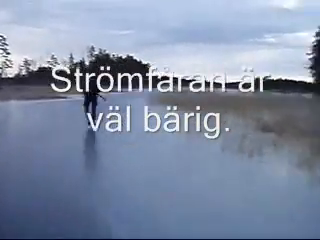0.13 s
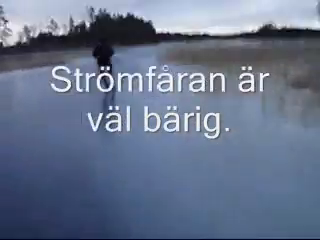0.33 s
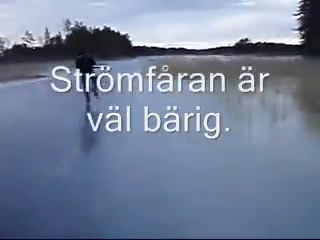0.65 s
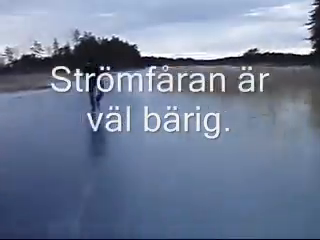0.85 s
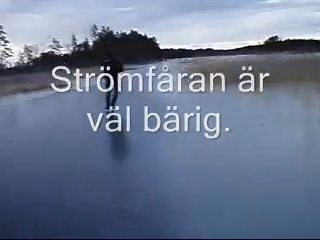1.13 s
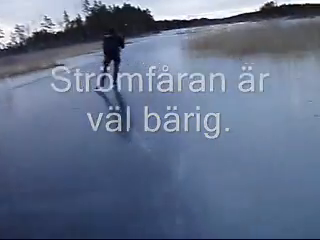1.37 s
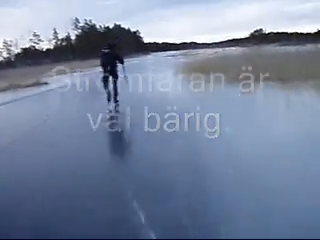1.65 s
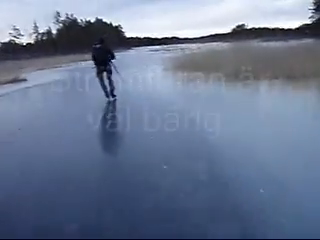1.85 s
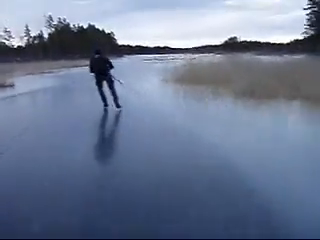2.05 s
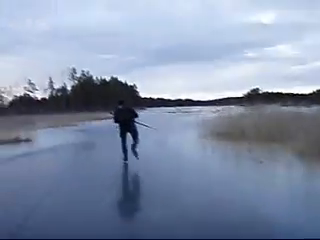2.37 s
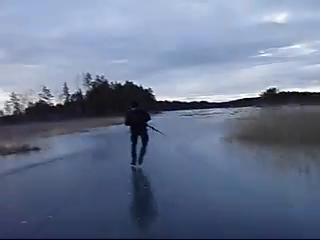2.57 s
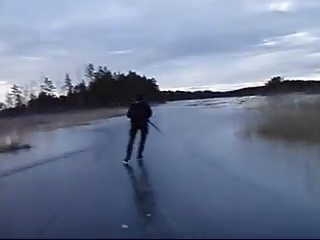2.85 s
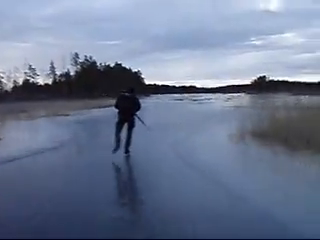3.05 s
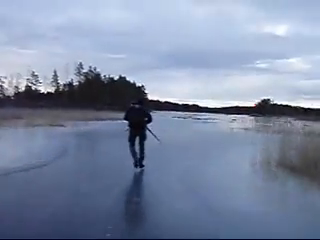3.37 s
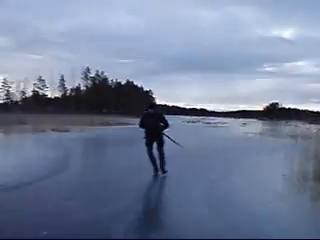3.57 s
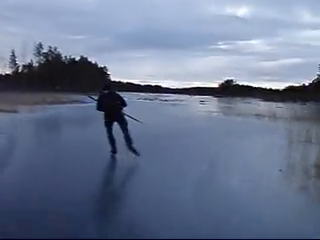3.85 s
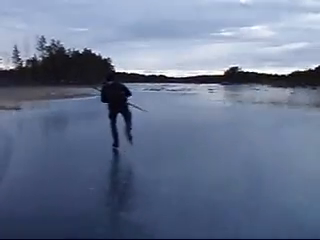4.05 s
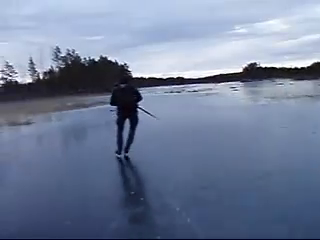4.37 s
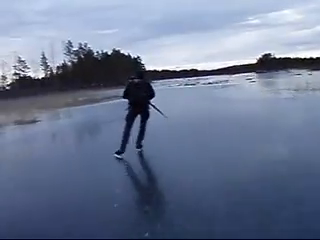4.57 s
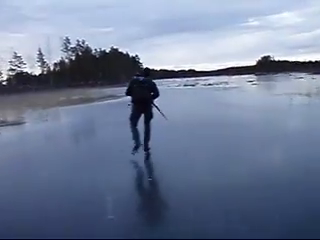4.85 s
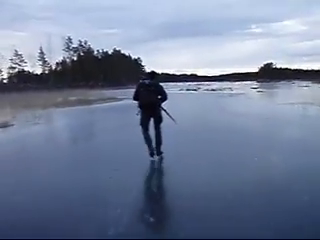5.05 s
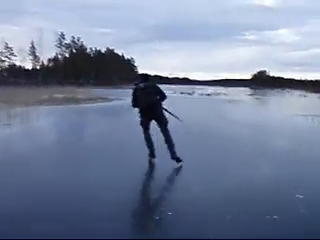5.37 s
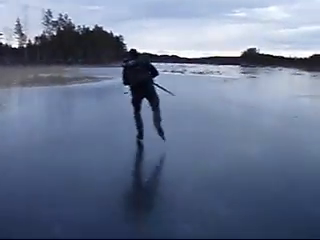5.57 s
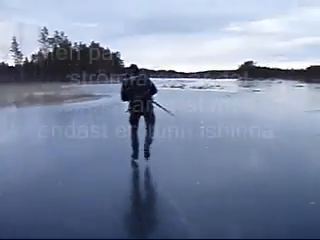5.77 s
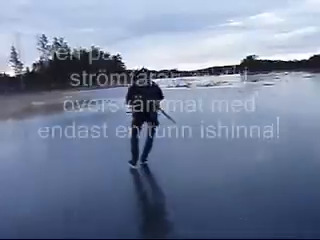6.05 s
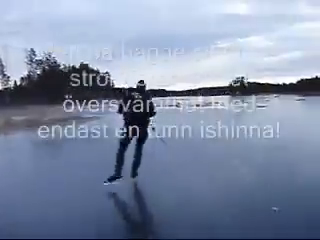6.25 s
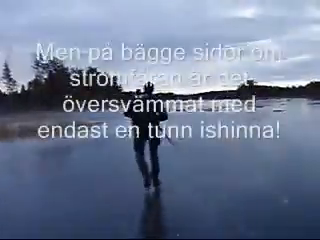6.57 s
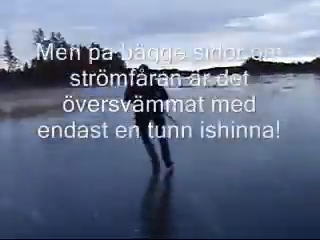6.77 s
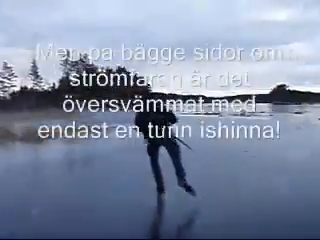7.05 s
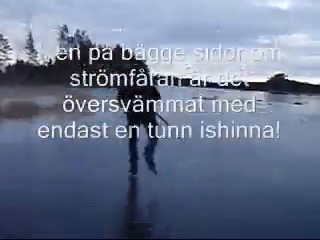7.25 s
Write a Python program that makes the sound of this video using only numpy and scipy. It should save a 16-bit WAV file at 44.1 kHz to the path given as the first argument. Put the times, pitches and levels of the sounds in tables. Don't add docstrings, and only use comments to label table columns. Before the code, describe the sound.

Long skate blades scrape and hiss across a frozen lake, with sharp ice cracks, hollow knocks and light wind buffeting the microphone.

```python
import sys
import numpy as np
from scipy import signal
from scipy.fft import rfft, irfft
from scipy.io import wavfile
from scipy.ndimage import uniform_filter1d

SR = 44100
rng = np.random.default_rng(int(sys.argv[2]) if len(sys.argv) > 2 else 0)


def pcm_store(signal):
    levels = np.round(np.clip(np.atleast_2d(signal), -1, 1) * 32767)
    wavfile.write(sys.argv[1], SR, levels.astype(np.int16).T)


def linear_from_db(decibels):
    return 10 ** (np.asarray(decibels, float) / 20)


N = 326823
SECONDS = np.arange(N) / SR


def rms_one(x):
    return x / np.sqrt(np.mean(x ** 2) + 1e-20)


def in_time(rows):
    s, *columns = np.transpose(rows)
    return [np.interp(SECONDS, s, column) for column in columns]


def drift(rate):
    r = np.exp(-2 * np.pi * rate / SR)
    slow = signal.lfilter([1], [1, -2 * r, r * r], rng.standard_normal(N + SR))
    return rms_one(slow[SR:])


def coloured(x, spectrum):
    size = 8192
    hz, db = np.transpose(spectrum)
    bins_hz = np.arange(size // 2 + 1) * SR / size
    log_gain = np.log(linear_from_db(np.interp(np.log(bins_hz + 1), np.log(hz), db)))
    cepstrum = irfft(log_gain)
    cepstrum[1:size // 2] *= 2
    cepstrum[size // 2 + 1:] = 0
    impulse = irfft(np.exp(rfft(cepstrum)))
    return signal.fftconvolve(x, impulse)[:len(x)]


def ring(clicks, hz, cycles):
    r, w = linear_from_db(-60 * hz / (cycles * SR)), 2 * np.pi * hz / SR
    return signal.lfilter([0, np.sin(w)], [1, -2 * r * np.cos(w), r * r], clicks + 1e-18)


def grains(per_s, spread_db, clump_db, clump_rate):
    sizes = linear_from_db(spread_db * np.minimum(rng.exponential(1, N), 4)) * rng.choice([-1, 1], N)
    return sizes * linear_from_db(clump_db * drift(clump_rate)) * (rng.random(N) < per_s / SR)


def stroke(s, db, rise_s, fall_s, hold):
    late = SECONDS - s
    away = np.maximum(late / fall_s, -late / rise_s)
    return linear_from_db(np.maximum(2 * db - 40 * away ** hold, -400))


# time in seconds, level in dB.
WIND_LEVEL = [(0, -37.5), (0.7, -35), (1.0, -41), (1.3, -37.5), (1.7, -40.5), (2.1, -32), (2.38, -33.5),
              (2.55, -39), (3.1, -34), (3.6, -42), (5.8, -39.5), (7.41, -40)]
# frequency in Hz, density in dB per Hz.
WIND_COLOUR = [(14, -29), (45, 1.5), (90, -2), (170, 1.5), (400, -22)]


def wind():
    level_db, = in_time(WIND_LEVEL)
    return linear_from_db(level_db + 2.8 * drift(8)) * rms_one(coloured(rng.standard_normal(N), WIND_COLOUR))


# time in seconds, edge pressure as shaving level in dB,
# roughness of the ice as crackle level in dB over the shaving.
GLIDE_PATH = [(0, -24.5, 2), (.2, -19.5, -2.5), (.45, -32.5, 0), (.84, -28, -9), (1.3, -31.5, -1),
              (1.65, -26.5, -5.5), (2.07, -30, -5), (2.5, -31, -21), (2.7, -26.5, 0.5), (3.4, -44, 3),
              (3.9, -41, -11.5), (4.2, -28.5, 1), (4.5, -34.5, -10), (5.03, -35, 7), (5.5, -24.5, 3.5),
              (5.7, -41, -16), (6.1, -26, -2), (6.67, -34, 2)]


def glide():
    glide_db, rough_db = in_time(GLIDE_PATH)
    glide_db = glide_db - 4
    return linear_from_db(2 * glide_db), linear_from_db(2 * (glide_db + rough_db))


# peak in seconds, level in dB,
# rise and fall in seconds for 20 dB.
PUSH_STROKES = [(.13, -24, 0.37, 0.66), (.59, -16.5, 0.14, 0.088), (.75, -27.5, 0.38, 0.061),
                (1.5, -11, 0.084, 0.0737), (1.78, -30, 0.36, 0.034), (2.23, -21.5, 0.66, 0.11),
                (2.42, -31.5, 0.142, 0.26), (3.004, -12, 0.066, 0.165), (3.31, -27, 0.99, 0.061),
                (3.371, -20, 0.011, 0.019), (3.53, -19.5, 0.13, 0.58), (3.89, -15, 0.14, 0.13),
                (4.04, -30, 0.155, 0.1), (4.27, -31, 0.48, 0.091), (4.72, -10.5, 0.17, 0.098),
                (4.91, -26, 0.22, 0.257), (5.09, -19.5, 0.045, 0.13), (5.23, -16, 0.12, 0.16),
                (5.41, -16, 0.152, 0.34), (6.316, -8, 0.13, 0.13), (6.49, -20.5, 0.053, 0.11),
                (6.6, -22.5, 0.128, 0.12), (6.71, -11.5, 0.012, 0.066), (6.84, -17.5, 0.11, 0.132),
                (6.93, -15.5, 0.042, 0.26), (7.06, -12.5, 0.186, 0.22), (7.4, -19.5, 0.065, .2)]
PUSH_HOLD = 1.01


def pushes():
    return sum(stroke(*row, PUSH_HOLD) for row in PUSH_STROKES)


# peak in seconds, level in dB,
# fall in seconds for 20 dB (negative: builds slowly, stops short), crackle pitch in Hz.
ICE_BITES = [(.04, -18.5, 0.26, 1640), (.52, -28.5, 0.97, 1760), (1.831, -26, 0.65, 1550),
             (1.929, -25.5, 0.9, 2100), (2.17, -27, 0.65, 1640), (2.559, -19, 0.2, 1904),
             (2.6, -24, 0.13, 1420), (2.75, -37, 0.8, 1610), (3.08, -27.5, 0.6, 2034),
             (3.493, -22, 0.73, 1550), (3.64, -24.5, 0.8, 2280), (3.81, -18, 0.3, 1500),
             (4.364, -20, 0.3, 1850), (4.547, -24, 0.5, 1500), (4.645, -39, 6, 1661),
             (4.88, -40, -2.02, 1692), (5.313, -31, 1, 1810), (5.41, -28, -2.5, 1500), (5.53, -32, 1, 1890),
             (6.35, -21.5, 0.26, 1660), (6.385, -32, 0.5, 1100), (6.704, -22.5, 1, 2170),
             (7.061, -21.5, 0.5, 1700), (7.335, -33, 3, 1780)]
BITE_HOLD, BITE_RISE_SHARE = 1.22, 0.081
BITE_SAG_PER_S, BITE_SAG_S = 6.9, 0.09


def bites():
    powers, pitches = [], []
    for s, db, fall_s, hz in ICE_BITES:
        powers.append(stroke(s, db, BITE_RISE_SHARE * fall_s, fall_s, BITE_HOLD))
        sag_per_s = BITE_SAG_PER_S * min(BITE_SAG_S / fall_s, 1)
        pitches.append(hz * np.exp(-sag_per_s * np.clip(SECONDS - s, 0, .1)))
    return powers, pitches


# start in seconds, length in seconds, level in dB,
# first and last pitch in Hz.
SKID_SCRAPES = [
    (0.909, 0.085, -18, 2000, 874),
    (1.056, 0.0456, -21, 1500, 1960),
    (1.759, 0.036, -22.5, 1500, 1300),
    (1.94, 0.03, -20, 1500, 1700),
    (4.046, 0.0165, -17.5, 1400, 1300),
    (5.497, 0.13, -28.5, 950, 800),
    (6.698, 0.027, -29, 2320, 2000),
    (3.502, 0.035, -22, 1500, 1300),
]
SCRAPE_RISE_S, SCRAPE_HOLD = 0.00185, 4.9


def scrapes():
    powers, pitches = [], []
    for s, length, db, *hz in SKID_SCRAPES:
        powers.append(stroke(s, db, SCRAPE_RISE_S, length, SCRAPE_HOLD))
        pitches.append(np.interp(SECONDS, [s, s + length], hz))
    return powers, pitches


PUSH_CRACKLES_DB, BITE_SHAVES_DB, SCRAPE_SHAVES_DB = -10, -3, -3
GLIDE_HZ, PUSH_HZ = 1500, 2150


def edge_work():
    glide_shave, glide_crackle = glide()
    push_shave = pushes()
    bite_powers, bite_hz = bites()
    scrape_powers, scrape_hz = scrapes()
    parts = [glide_crackle, linear_from_db(2 * PUSH_CRACKLES_DB) * push_shave] + bite_powers + scrape_powers
    pitches = [GLIDE_HZ, PUSH_HZ] + bite_hz + scrape_hz
    crackles = sum(parts)
    centre_hz = sum(part * hz for part, hz in zip(parts, pitches)) / crackles
    shave = glide_shave + push_shave
    shave = shave + linear_from_db(2 * BITE_SHAVES_DB) * sum(bite_powers) + linear_from_db(2 * SCRAPE_SHAVES_DB) * sum(scrape_powers)
    return 10 * np.log10(shave), 10 * np.log10(crackles), centre_hz, glide_crackle / crackles


# middle in seconds, length in seconds, depth in dB (negative: a slight
BLADE_DIPS = [(0.053, 0.0052, 11), (0.079, 0.0088, 4.5), (0.204, 0.011, 5), (0.46, 0.0085, 10),
              (0.473, 0.016, 6), (0.609, 0.01, 6.5), (0.915, 0.0059, 8), (1.874, 0.0124, 4),
              (2.048, 0.017, 7), (2.085, 0.0039, 20), (2.16, 0.02, 5), (2.194, 0.014, 4),
              (2.381, 0.0113, 6.5), (2.756, 0.0074, -1), (3.077, 0.022, 2.5), (3.26, 0.0144, 6),
              (3.482, 0.0098, 18), (3.716, 0.013, 6.5), (3.79, 0.0087, 13), (3.843, 0.015, 3.5),
              (3.867, 0.0094, 6.5), (3.893, 0.0093, 4), (4.433, 0.0132, 8), (4.463, 0.017, 12),
              (4.499, 0.0183, 7.5), (4.533, 0.0108, 3), (4.589, 0.01, 12.5), (4.615, 0.021, 9.5),
              (5.242, 0.008, 8), (5.385, 0.0085, 6), (5.404, 0.0069, 4), (5.51, 0.0082, 5.5),
              (5.529, 0.014, 2), (5.929, 0.0077, 9), (6.114, 0.013, 12), (6.252, 0.0087, 7),
              (6.662, 0.02, 10.5), (6.689, 0.0083, 11), (6.747, 0.011, 4.5), (6.821, 0.02, 4.5),
              (6.949, 0.0113, 2.5), (7.167, 0.014, 4), (7.24, 0.013, 5.5), (7.274, 0.015, 13)]


def dip_gain():
    loss_db = 0
    for s, length, depth_db in BLADE_DIPS:
        away = np.minimum((1.6 * (SECONDS - s) / length) ** 2, 50)
        loss_db = loss_db + depth_db * np.exp(-away ** 2)
    return linear_from_db(-loss_db)


def uneven_grip():
    stutter = drift(63.0) + 0.86 * drift(43)
    settling = 160 * SECONDS
    return np.maximum.accumulate(stutter + settling) - settling


def patchy(x, depth_db):
    edges = np.geomspace(5200, 11000, 5)
    out = x
    for pair in zip(edges, edges[1:]):
        band = signal.sosfilt(signal.butter(1, pair, "band", fs=SR, output="sos"), x)
        out = out + (linear_from_db(depth_db * drift(22.0)) - 1) * band
    return out


# frequency in Hz, density in dB per Hz.
SPLINTER_COLOUR = [(900, -33), (2500, -10), (3450, -5.5), (3830, 0), (4040, -2.5), (4260, -.5),
                   (4750, -8.5), (5700, -15.5), (7300, -23.5), (8250, -19.5), (9200, -24.5), (11200, -18.5),
                   (11820, -10.5), (12400, -13)]


def shaving(stutter, level_db):
    splinters = grains(14000, spread_db=2.0, clump_db=3.0, clump_rate=410)
    splinters *= linear_from_db(np.interp(level_db, [-35, -10], [1.8, 1.3]) * stutter)
    return linear_from_db(level_db + 3.0) * rms_one(patchy(coloured(splinters, SPLINTER_COLOUR), depth_db=2.5))


GLIDE_FOCUS_DB, WORK_FOCUS_DB = 7.5, 15
PITCH_WANDER = 0.46
CRACKLE_CYCLES = 30.0


def crackle(stutter, level_db, centre_hz, gliding):
    clicks = grains(4500, spread_db=3.0, clump_db=2.0, clump_rate=134) * linear_from_db(1.3 * stutter)
    pitches, dealt = np.geomspace(640, 2900, 14), rng.integers(0, 14, N)
    wander = rms_one(uniform_filter1d(stutter[::-1], size=3000))
    centre_hz = centre_hz * 2 ** (PITCH_WANDER * gliding * wander)
    focus_db = GLIDE_FOCUS_DB * gliding + WORK_FOCUS_DB * (1 - gliding)
    rings = 0
    for k, hz in enumerate(pitches):
        gain = linear_from_db(-focus_db * np.log2(hz / centre_hz) ** 2)
        rings = rings + ring(clicks * (dealt == k) * gain, hz, CRACKLE_CYCLES)
    low_cut = signal.butter(2, 680, "high", fs=SR, output="sos")
    return linear_from_db(level_db - 1.3) * rms_one(signal.sosfilt(low_cut, rings))


# peak in seconds, level in dB,
# rise and fall in seconds for 20 dB.
SHEET_GROANS = [
    (.96, -30, 0.062, 0.046),
    (2.67, -34.5, 0.15, 0.72),
    (3.535, -23.5, 0.02, 0.48),
    (4.06, -40.5, 0.31, 0.105),
    (5.45, -28, 0.083, 0.25),
]


def groans():
    return sum(stroke(*row, PUSH_HOLD) for row in SHEET_GROANS)


# frequency in Hz, density in dB per Hz.
SHEET_COLOUR = [(90, -14), (200, -2), (350, -1.5), (600, -3), (900, -15), (1500, -23)]
LOAD_DB, LOAD_FOLLOWS, LOAD_SMOOTH_S = -37, 0.57, 0.091


def rumble(crackle_db):
    load = uniform_filter1d(crackle_db - crackle_db.mean(), int(LOAD_SMOOTH_S * SR))
    level_db = 10 * np.log10(linear_from_db(2 * (LOAD_DB + LOAD_FOLLOWS * load)) + groans())
    lumps = grains(1500, spread_db=3.2, clump_db=2.2, clump_rate=19.5)
    return linear_from_db(level_db + 1.0) * rms_one(coloured(lumps, SHEET_COLOUR))


THUMP_START_HZ, THUMP_END_HZ = 725, 238
THUMP_SPREAD = 0.62
KNOCK_CYCLES, KNOCK_CYCLES_PER_KHZ = 0.58, 0.45
REPEAT_S, REPEAT_SPREAD_S, REPEAT_DB = .0009, .0022, -4.5
PORT_HZ, PORT_CYCLES = 4050, 26.0
PORT_SHARE, LOUD_PORT_SHARE = .04, 0.017


def knock_of(t, hz, hiss):
    cycles = KNOCK_CYCLES + KNOCK_CYCLES_PER_KHZ * hz / 1000
    fall = 1 + 0.66 * np.exp(-t / 0.0006)
    tone = np.sin(2 * np.pi * hz * 0.869 * np.cumsum(fall) / SR)
    return tone * np.exp(-t * hz / cycles) * (1 + 1.14 * uniform_filter1d(hiss, size=4))


def thump_of(t, luck):
    fall_s = 0.00076 + 0.0021 * luck[0]
    hz = THUMP_END_HZ + (THUMP_START_HZ - THUMP_END_HZ) * np.exp(-t / fall_s)
    hz = hz * 2 ** (THUMP_SPREAD * (luck[1] - .62))
    swell = t / 0.0019 * np.exp(1 - t / 0.001482)
    return np.sin(2 * np.pi * (np.cumsum(hz) / SR + 0.417 + 0.18 * luck[1])) * swell


def snap_of(t, snap_db, luck, hiss):
    burst_s = 0.00059 + 0.00075 * luck[2] + 0.00038 * linear_from_db(min(snap_db, 4) - 10.5)
    snap = coloured(hiss * t ** 0.76 * np.exp(-t / burst_s), SPLINTER_COLOUR)
    port_share = PORT_SHARE + LOUD_PORT_SHARE * linear_from_db(snap_db)
    snap = snap + port_share * ring(snap, PORT_HZ, PORT_CYCLES)
    return snap / np.abs(snap).max()


def cracks(rows):
    size = SR // 40
    t, out = np.arange(size) / SR, np.zeros(N + size)
    chance, noise = rng.random((len(rows), 3)), rng.standard_normal((len(rows), size))
    for (s, hz, thump_db, knock_db, snap_db), luck, hiss in zip(rows, chance, noise):
        knock = knock_of(t, hz, hiss)
        delay = round((REPEAT_S + REPEAT_SPREAD_S * luck[2]) * SR)
        second = np.concatenate([np.zeros(delay), knock[:-delay]])
        knock = knock + linear_from_db(REPEAT_DB) * np.sign(luck[1] - .5) * second
        at = round((s - .0002) * SR)
        out[at:at + size] += linear_from_db(knock_db + 4.5) * knock
        out[at:at + size] += linear_from_db(thump_db + 1.0) * thump_of(t, luck)
        out[at:at + size] += linear_from_db(snap_db - 0.1) * snap_of(t, snap_db, luck, hiss)
    return out[:N]


def ice_echo(x):
    lag = round(.00235 * SR)
    return x + linear_from_db(-16) * np.concatenate([np.zeros(lag), x[:-lag]])


def knocking(table, thump_over_knock_db):
    return [(s, hz, db + thump_over_knock_db, db, snap_db) for s, hz, db, snap_db in table]


# start in seconds, knock pitch in
# Hz, knock level in dB, snap level in dB.
EDGE_CHIPS = [(0.092, 1210.0, -11, -9), (0.276, 1200.0, -27.5, -5), (0.352, 1550.0, -21, -8.5),
              (0.551, 1860.0, -31, -6), (0.73, 2210.0, -28, -4), (0.943, 1360, -6, -7),
              (1.068, 1950, -8.5, -7), (1.084, 1730, -11.5, -32.5), (1.86, 1312, -4.5, -13),
              (1.891, 1400.0, -20, -7), (1.997, 2130.0, -33.5, -7), (2.133, 1660, -17, -9),
              (2.573, 1630.0, -25, -13), (3.203, 1070, -20, -35.5), (3.497, 1670, -11.5, -14),
              (3.539, 1310.0, -9.5, -33.5), (3.658, 2180.0, -31, -7), (3.688, 2120, -10, -10),
              (3.723, 1270, -5, -34.5), (3.805, 1990.0, -28, -4), (3.859, 1350.0, -37, -14),
              (4.076, 1580, -17.5, -7), (4.095, 1230, -10, -35), (4.308, 990, -14.5, -36),
              (4.4, 1530.0, -6, -22), (4.563, 1580, -4, -6), (4.573, 2150, -8, -37),
              (4.65, 1350.0, -15, -19), (4.655, 1250.0, -15.5, -10.5), (4.938, 1490.0, -9, -26),
              (4.952, 1160, -3.5, -35.5), (5.061, 2230.0, -18.5, -5.5), (5.183, 2350.0, -39.5, -2),
              (5.22, 1530.0, -15, -35), (5.334, 1620, -5, -27), (5.35, 1840.0, -12, -9),
              (5.339, 1030, -17.5, -28), (0.466, 940, -13.5, -28), (2.228, 900, -22, -30),
              (5.47, 844, -3, -28), (5.421, 1890, -11, -31), (5.442, 1980.0, -37, -15),
              (5.542, 1630.0, -15, -9), (6.24, 1800, -12, -44), (6.35, 1780.0, -18, -13.5),
              (6.367, 1780.0, -10, -55), (6.468, 1950.0, -43, -11), (6.697, 2330, -17, -15),
              (6.731, 1440.0, -45, -19), (6.931, 1610, -15, -14), (7.078, 1570, -6.5, -35.5),
              (7.095, 1710, -10, -36), (7.119, 1460.0, -33.5, -4), (7.133, 1870.0, -37.5, -14)]


def chips():
    return knocking(EDGE_CHIPS, -14)


# start in seconds, knock pitch in Hz,
# knock level in dB, snap level in dB.
DEEP = [(.095, 2680, -12, 1), (.12, 1280, -4, -22), (1.84, 1480, -5, -5), (1.861, 713, -10.5, -14),
        (2.006, 2310, -15, -0.5), (2.634, 1130, -11, -10), (2.651, 1290, -11.5, -8),
        (2.676, 1320, -8.5, -9), (2.8455, 1050, -6.5, -21.5), (3.184, 1290, -1.5, -4),
        (3.206, 665, -9.5, -11), (3.699, 920, -9, -15), (3.724, 1120, -11, -13), (3.772, 1200, -9, -1),
        (3.815, 1760, -14, -11), (3.878, 1143, -5, -24), (3.946, 575, -3.5, 8), (4.31, 645, -9, -21.5),
        (4.415, 1082, -6, -10), (4.475, 1020, 2.5, 1), (4.526, 1040, -4.5, 1), (4.563, 606, -5, -13),
        (4.631, 940, 1, 0), (4.673, 820, -3.5, -0.5), (4.739, 923, -3, -5.5), (4.793, 930, -9, -30),
        (4.953, 674, -8.5, -3.5), (5.097, 850, -1, 0), (5.846, 1110, -3.5, -8), (7.122, 695, -9, -18)]


def deep_cracks():
    return knocking(DEEP, -3.5)


# start in seconds, knock pitch in Hz,
# knock level in dB, snap level in dB.
FULL = [(.132, 1280, -6, -9), (.173, 1134, 6.5, 0), (.541, 2040, -6.5, -21.5), (.654, 2150, -11, -5.5),
        (1.827, 1260, -2, -5), (1.922, 1168, 4, -8), (2.574, 1230, -15.5, -12), (2.593, 1500, -8, -16),
        (3.737, 1037, 2, 4.5), (3.778, 1140, 2.5, 10.5), (3.98, 1360, 0, -24.5), (4.0955, 694, -4.5, -6.5),
        (4.241, 1900, -12.5, -10), (4.872, 1000, -5, 4.5), (4.891, 1270, -1, -2), (5.017, 820, -12, -11.5),
        (5.054, 2320, 3, -4), (5.422, 2350, -6.5, 4), (5.47, 2000, 4, 2), (5.635, 2870, -20, 1),
        (5.7385, 900, -8.5, -11.5), (5.822, 880, -10.5, -24), (5.866, 2344, -11.5, -35),
        (6.4, 1740, -11.5, -20.5), (6.928, 1490, -9, -27.5), (7.076, 1700, -16, -32),
        (7.304, 2100, -14, -2)]


def full_cracks():
    return knocking(FULL, -11)


# start in seconds, knock pitch in Hz,
# knock level in dB, snap level in dB.
SHALLOW = [(.221, 1966, -4.5, -5), (.883, 1630, -9, 0.5), (.92, 1693, -6.5, -8), (1.738, 1260, -11.5, 0),
           (2.537, 1230, -5, -3), (2.563, 1660, 4, -7.5), (2.814, 1200, -13.5, -6.5),
           (3.412, 2810, -22, -8), (3.485, 1580, -6, -10), (3.497, 1500, -32, -9), (3.513, 1496, -8, -7.5),
           (3.8357, 1080, -8, 0), (4.0345, 2750, -6.5, -4), (4.042, 2650, -14, -1), (4.054, 1530, -8, -24),
           (4.22, 680, -11.5, -23), (4.287, 1636, -9.5, -5), (4.34, 1650, -1, -18),
           (4.363, 1290, -3.5, -10), (4.38, 2130, -2, -18), (4.901, 2360, -2, -15.5), (4.915, 1183, -5, -8),
           (4.921, 800, -6.5, 0), (5.272, 2370, -9, 1.5), (5.315, 1660, -6.5, -22), (6.698, 2570, -15, -4),
           (6.834, 2790, -5.5, -15), (6.96, 1600, -6, 4), (7.35, 1735, -12, -54), (7.361, 1570, -6, -7)]


def shallow_cracks():
    return knocking(SHALLOW, -43)


DULL_HZ = 800
# start in seconds, thump level in dB, snap level in
# dB.
DULL = [(.299, -17, -7.5), (.379, -20, -32), (1.158, -34, -31), (1.551, -20.5, -29), (7.214, -16, -52),
        (7.239, -33, -33), (1.174, -16, -17), (2.706, -7, -12), (3.142, -13, -7), (4.028, -16, -29),
        (4.258, -15.5, -4.5), (4.774, -9.5, -5), (4.826, -10.5, -13), (4.838, -19, -27), (5.131, -17, -1.5),
        (5.694, -12, -6), (5.774, -16, -37.5), (5.905, -15.5, -19), (5.936, -13, -12), (5.998, -13, -7.5),
        (6.024, -13.5, -3), (6.05, -22, -13.5), (6.157, -13.5, -22.5), (6.193, -19, -5), (6.236, -12.5, -4),
        (6.491, -6.5, -5), (6.526, -9.5, -14), (6.763, -25, -2.5), (6.814, -16.5, 0), (7.25, -27, -7)]


def dull_cracks():
    return [(s, DULL_HZ, db, db - 5, snap_db) for s, db, snap_db in DULL]


# start in seconds, snap level in dB.
SURFACE_SNAPS = [(.361, -5), (0.4625, 3), (0.53, -1.5), (0.55, -27), (.594, 1), (.737, 1.5), (.911, -24.5),
                 (1.059, -7), (1.35, -8), (2.075, 3), (2.09, -4), (2.356, -5), (2.1, -1), (3.604, 6.5),
                 (4.549, -5), (4.574, -8), (4.969, -7.5), (5.082, -4.5), (5.683, -8), (4.718, 0),
                 (5.222, 1), (5.226, -1), (5.338, 3), (5.395, 1), (5.487, -0.5), (6.143, 0), (6.618, -5.5),
                 (6.717, -3), (7.325, -9)]


def surface_snaps():
    return [(s, 1500, db - 34, db - 46.5, db) for s, db in SURFACE_SNAPS]


# start in seconds, thump level in dB.
SHEET_TAPS = [(0.529, -18), (0.574, -23), (0.956, -22), (1.51, -20), (1.734, -29), (1.885, -19),
              (1.898, -16), (2.073, -21), (2.139, -27), (2.223, -21), (2.454, -22.5), (2.794, -18),
              (2.907, -25), (2.973, -21.5), (3.004, -20), (3.029, -23), (3.564, -14), (3.904, -13.5),
              (4.546, -17), (4.65, -18), (4.697, -18), (4.719, -20), (5.201, -20.5), (5.226, -24),
              (5.373, -25), (5.402, -23), (5.625, -24), (5.645, -20), (6.339, -22), (6.424, -24.5),
              (6.453, -25), (6.736, -23.5), (6.771, -18), (6.803, -21), (6.828, -18), (6.879, -27),
              (7.002, -23), (7.257, -16.5), (7.389, -21), (7.401, -18)]


def taps():
    return [(s, DULL_HZ, db, db - 4.5, db - 25.5) for s, db in SHEET_TAPS]


PING_S, PING_DB, PING_RISE_S = .4625, 8.5, 0.00074


def ping():
    late = np.maximum(SECONDS - PING_S, 0)
    swell = (late / PING_RISE_S) ** 2 * np.exp(-late / PING_RISE_S)
    low_mode = np.sin(2 * np.pi * 3830 * late)
    high_mode = 0.98 * np.sin(2 * np.pi * 4260 * late + 4.3)
    return linear_from_db(PING_DB) * swell * (low_mode + high_mode)


# time in seconds, pitch in Hz, level in dB.
BLADE_NOTES = [
    [(5.12, 1154, -45.5), (5.138, 1111, -34), (5.152, 1127, -51), (5.166, 1161, -38), (5.204, 1170, -34),
     (5.225, 1129, -25)],
    [(6.7, 1160, -38), (6.71, 1138, -28), (6.806, 1135, -35), (6.826, 1122, -46), (6.842, 1130, -23.5),
     (6.885, 1118, -34)],
]


def singing_blade():
    rows = []
    for note in BLADE_NOTES:
        (first_s, first_hz, _), (last_s, last_hz, _) = note[0], note[-1]
        rows += [(first_s - .004, first_hz, -90), *note, (last_s + .004, last_hz, -90)]
    hz, level_db = in_time(rows)
    rough = rms_one(ring(rng.standard_normal(N), hz.mean(), 57.0))
    return linear_from_db(level_db) * (1.05 * np.sin(2 * np.pi * np.cumsum(hz) / SR) + .7 * rough)


def scene():
    stutter = uneven_grip()
    shave_db, crackle_db, centre_hz, gliding = edge_work()
    edge = shaving(stutter, shave_db) + crackle(stutter, crackle_db, centre_hz, gliding)
    blades = dip_gain() * edge + singing_blade() + ping()
    breaks = full_cracks() + shallow_cracks() + deep_cracks() + dull_cracks() + surface_snaps()
    fractures = ice_echo(cracks(breaks + chips() + taps()))
    return (blades + fractures + rumble(crackle_db) + wind())[None]


def top_cut(x):
    return signal.sosfilt(signal.butter(12, 12430, fs=SR, output="sos"), x)


def record(dry):
    narrow = signal.sosfilt(signal.cheby2(24, 60, 12480, fs=SR, output="sos"), dry)
    return top_cut(np.clip(narrow, -.99, .99))


dry = scene()
out = record(dry)
pcm_store(out)
```